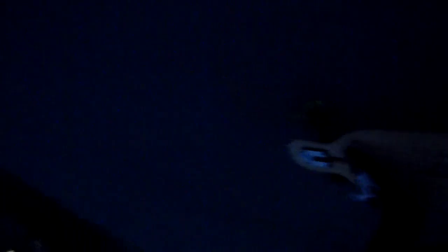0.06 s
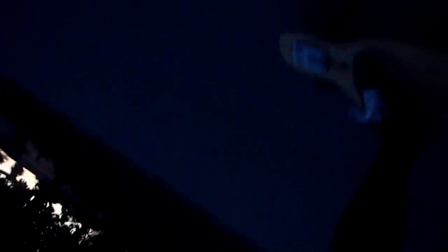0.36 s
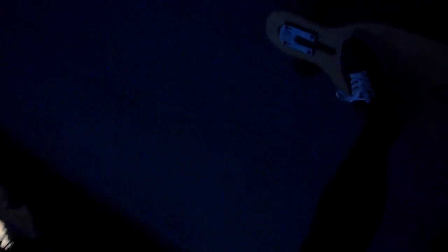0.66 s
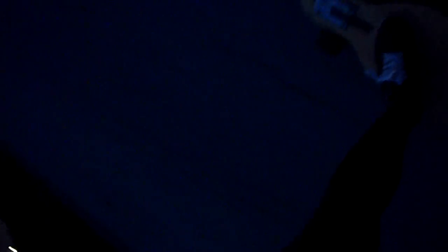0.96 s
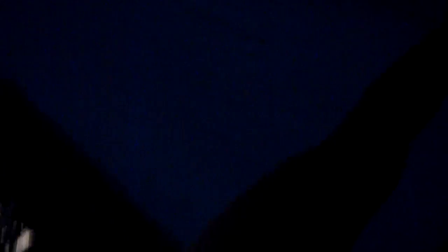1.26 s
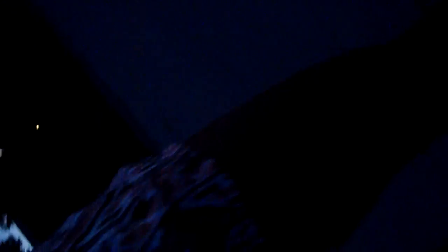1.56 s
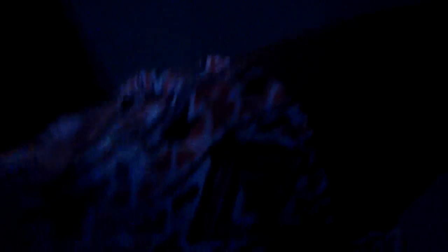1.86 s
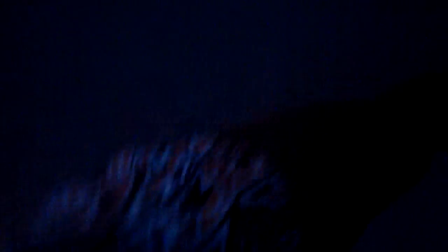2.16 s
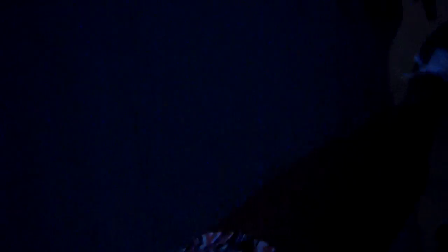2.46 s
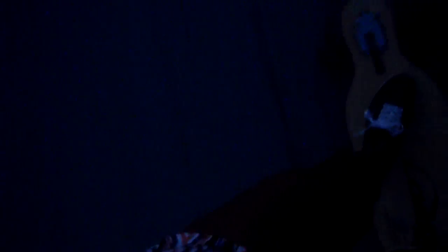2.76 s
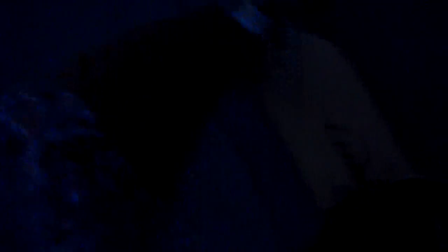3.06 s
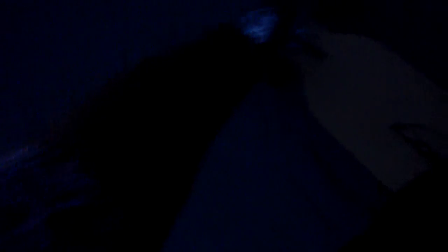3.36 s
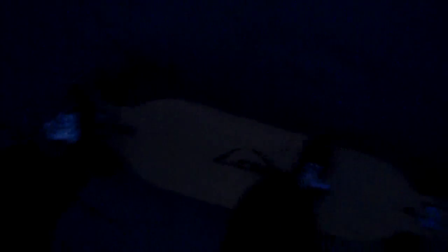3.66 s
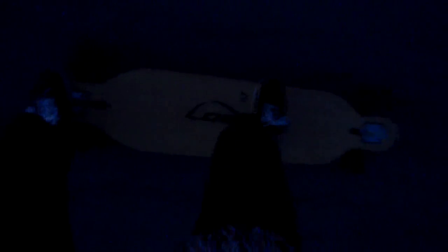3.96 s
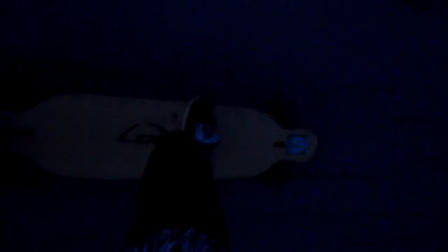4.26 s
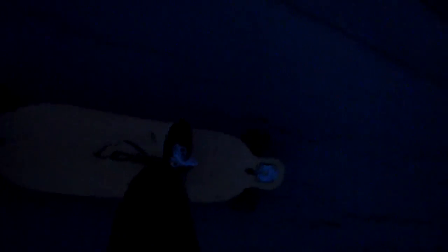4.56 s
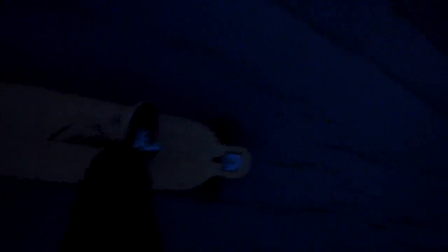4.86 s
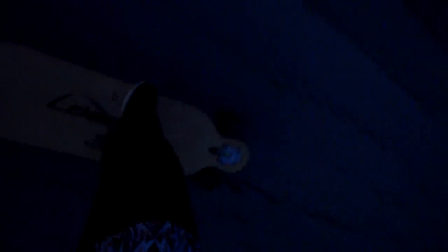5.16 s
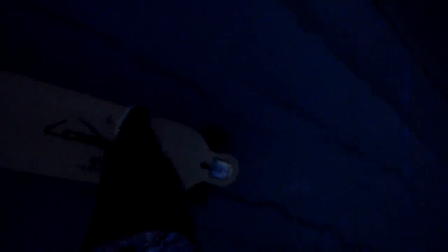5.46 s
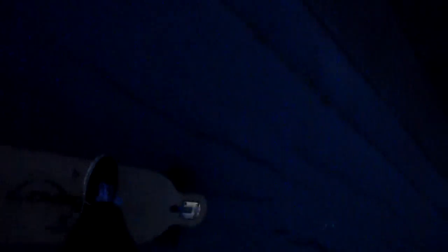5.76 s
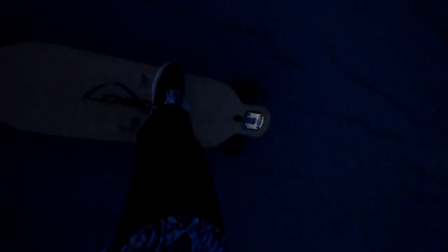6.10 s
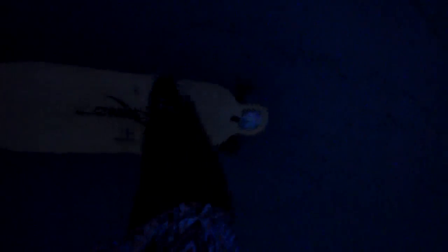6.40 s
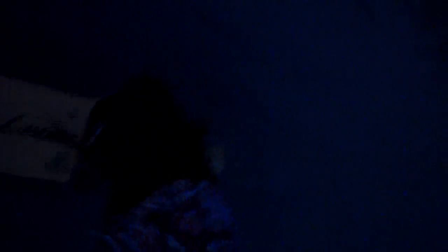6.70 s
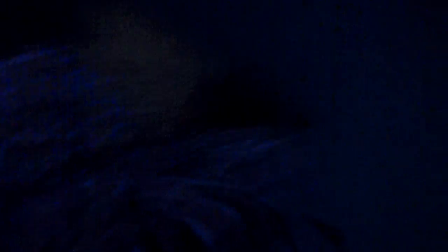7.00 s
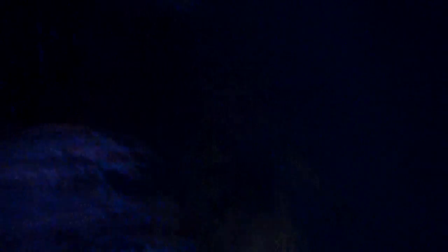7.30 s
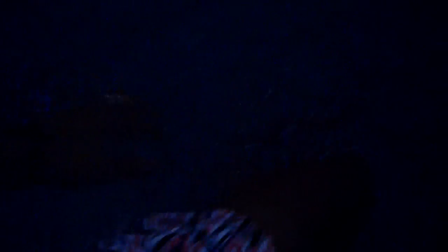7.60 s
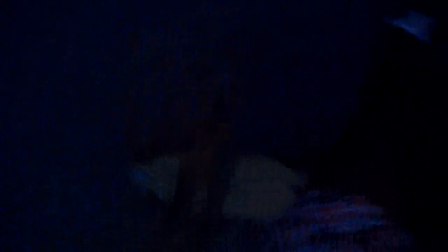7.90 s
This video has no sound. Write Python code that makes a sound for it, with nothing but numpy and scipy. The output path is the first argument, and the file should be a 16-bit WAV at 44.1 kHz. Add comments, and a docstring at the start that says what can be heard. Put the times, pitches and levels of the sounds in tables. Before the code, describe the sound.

Skateboard wheels rumble and crunch along pavement, with sharp clicks, handling knocks and wind puffs, until the rider steps off.

```python
"""Longboard on night asphalt

A longboard rolls over rough asphalt, heard by a small hand-held camera in a hard case. The road grain
drives the drone of wheels and deck and a gritty hiss that rings in the case near 5 kHz. Wheels scrub in
turns, stones snap, and a sole scuffs as the rider steps off. Air buffets the microphone; the case is
rubbed and knocked, and a limiter ducks the ride after hard knocks."""
import sys
import numpy as np
from scipy import signal
from scipy.fft import rfft, irfft, next_fast_len
from scipy.io import wavfile
from scipy.ndimage import minimum_filter1d

SR = 44100
rng = np.random.default_rng(int(sys.argv[2]) if len(sys.argv) > 2 else 0)


def wrap_up_sound(samples):
    """Save the sound to the file named by the first command line argument, as 16-bit audio."""
    columns = np.atleast_2d(samples).T
    # keep every value between -1 and 1, then stretch to whole-number steps
    tamed = np.clip(columns, -1, 1)
    steps = np.round(tamed * 32767).astype(np.int16)
    wavfile.write(sys.argv[1], SR, steps)


N = 358972
TIME = np.arange(N) / SR


def gain_of(db):
    """Decibels to gain."""
    return 10 ** (np.asarray(db) / 20)


def unit_rms(x):
    """Scales to rms 1."""
    return x / np.sqrt(np.mean(x ** 2) + 1e-20)


def add(mix, s, sound):
    """Lays a sound into the mix at time s."""
    part = mix[max(0, round(s * SR)):][:len(sound)]
    part += sound[:len(part)]


def curve(points):
    """An automation line through (time, value) points."""
    return np.interp(TIME, *np.transpose(points))


def faders(rows):
    """Each dB column of an automation table as a gain over time."""
    times, *columns = np.transpose(rows)
    return [gain_of(np.interp(TIME, times, db)) for db in columns]


def swell(s, half_s):
    """A smooth rise and fall about time s."""
    return np.exp(-np.minimum(((TIME - s) / half_s) ** 2, 50))


def wander(rate_hz, size=2 ** 14):
    """Random drift of rms 1, up to about rate_hz."""
    step_s = TIME[-1] / size
    hz = np.fft.rfftfreq(size, step_s)
    drift = irfft(rfft(rng.standard_normal(size)) * hz / (hz + 2) * np.exp(-(hz / rate_hz) ** 2))
    return unit_rms(np.interp(TIME, np.arange(size) * step_s, drift))


def grains(per_s, spread_db):
    """Random tiny impacts; a positive spread makes a few stand out, a negative one sinks some."""
    size = gain_of(spread_db * np.minimum(rng.exponential(1, N), 4))
    return unit_rms(size * rng.choice([-1., 1.], N) * (rng.random(N) < per_s / SR))


def equalised(x, points):
    """Shapes x with an EQ curve of (frequency [Hz], level [dB]) points, at rms 1."""
    point_hz, db = np.transpose(points)
    size = next_fast_len(N, real=True)
    hz = np.fft.rfftfreq(size, 1 / SR)
    response = gain_of(np.interp(np.log(hz + 1), np.log(point_hz), db))
    return unit_rms(irfft(rfft(x, size) * response, size)[:N])


def tilted(x, db_per_octave):
    """Brightens or dulls a short sound, at rms 1."""
    octaves = np.log2(np.fft.rfftfreq(len(x), 1 / SR) + 200)
    return unit_rms(irfft(rfft(x) * gain_of(db_per_octave * octaves), len(x)))


def resonate(x, hz, width_hz):
    """A steep resonance that follows the curve hz, at rms 1."""
    carrier = np.exp(2j * np.pi * np.cumsum(hz) / SR)
    pole = np.exp(-np.pi * width_hz / SR)
    return unit_rms((carrier * signal.lfilter([1], np.poly([pole, pole]), x / carrier)).real)


def ring(modes):
    """Dying modes of alternating sign; each place that is struck shifts and weights them differently."""
    t = TIME[:SR // 20]
    hz, db, t60 = np.transpose(modes)[:, :, None]
    shift, weight = rng.standard_normal((2, len(modes), 1))
    hz = hz * (1 + .03 * shift + .04 * rng.uniform(-1, 1))
    waves = gain_of(db + 1.5 * weight - 60 * t / t60) * np.sin(2 * np.pi * hz * t)
    return (-1) ** np.arange(len(modes)) @ waves


def bearing_whine(width_hz=19, waver=0.002):
    """A thin metallic whine and faint fizz, likely the bearings, exposed once the roll dies away."""
    # both: (frequency [Hz], level [dB])
    tones = [(4600, -12), (4770, -1), (4877, 4.5), (5015, 2), (5163, 0), (5346, -3.5)]
    fizz_eq = [(6000, -23), (7100, -5), (8200, -13), (9700, -1), (11500, -15)]
    rattle = rng.standard_normal(N)
    drift = 1 + waver * wander(24)
    whine = unit_rms(sum(gain_of(db) * resonate(rattle, hz * drift, width_hz) for hz, db in tones))
    fizz = gain_of(-9) * equalised(rattle, fizz_eq)
    return gain_of(curve([(6.0, -46), (7.4, -45.5)])) * (whine + fizz)


# Dark tone of air on the microphone: (frequency [Hz], level [dB])
WIND_EQ = [(30, -55), (130, -6), (280, 1.5), (420, -2.5), (650, -16), (3000, -68)]
# Low-end bed from the camera being carried: (time [s], level [dB])
CARRY_RUMBLE = [(3.2, -57.5), (3.7, -46), (6.6, -51.5), (7.4, -46)]
# Puffs on the moving microphone: (peak time [s], half length [s], rumble [dB], deep thud [dB])
AIR_PUFFS = [(0.9, 0.12, -39.5, -68), (3.767, 0.12, -26.5, -60), (4.116, 0.23, -33, -57),
             (4.151, .008, -35, -23), (4.43, 0.073, -35, -45), (5.657, 0.29, -36, -45),
             (6.356, 0.033, -37, -57), (7.06, 0.027, -30, -25), (7.28, 0.13, -30.5, -41.5),
             (7.533, 0.016, -35, -28), (8.005, 0.012, -17.5, -11)]


def wind(breeze_db=-47):
    """Lumpy low buffeting that swells in puffs, with deep thuds when the camera swings."""
    lumps = rng.standard_normal(N) * gain_of(3.16 * wander(28))
    rumble_gain, thud_gain = gain_of(breeze_db), gain_of(curve(CARRY_RUMBLE))
    for s, half_s, rumble_db, thud_db in AIR_PUFFS:
        puff = swell(s, half_s)
        rumble_gain = np.hypot(rumble_gain, gain_of(rumble_db) * puff)
        thud_gain = np.hypot(thud_gain, gain_of(thud_db) * puff)
    thuds = equalised(lumps, [(130, -20.5), (600, -63.0)])
    return rumble_gain * equalised(lumps, WIND_EQ) + thud_gain * thuds


# Resonances of the hard case: (frequency [Hz], level [dB], decay t60 [s])
CASE_MODES = [(400, -8.5, 0.013), (727, -2.5, 0.018), (1010, -2.5, 0.018), (1519, 3.5, 0.014),
              (2063, 5, 0.0053), (2423, 5.5, 0.0064), (2910, 0, 0.016), (3180, 4, 0.0044),
              (4730, -5, 0.022), (8700, -26, 0.087)]


def through_case(force):
    """A force on the case sets its short, hard modes ringing."""
    return signal.fftconvolve(force, ring(CASE_MODES))


# The grip slipping on the case: (time [s], length [s], level [dB], brightness [dB/octave])
GRIP_RUBS = [(0.184, 0.035, -29.5, -1), (4.058, 0.019, -26, 2.5), (4.081, 0.034, -27.5, 2),
             (4.394, 0.019, -29.5, -3.5), (4.542, 0.049, -30, -2), (4.782, 0.02, -30, -2),
             (5.767, 0.044, -23.5, -1.5), (6.997, 0.017, -8, 2), (7.006, 0.032, -19.5, -1),
             (7.23, 0.044, -31, -4), (7.505, 0.033, -33.5, 1), (7.608, 0.1, -35, -3.5),
             (7.716, 0.056, -31.5, -1.5), (7.824, 0.12, -37.5, 4.5)]


def grip_rubs(ring_trim_db=2.5, direct_trim_db=-13.5):
    """Uneven stick-slip pulses, heard directly and through the case modes."""
    out = np.zeros(N)
    slip_eq = [(700, -0.5), (1500, -3.5), (3000, -3.5), (4700, -15.0), (9000, -22)]
    slips = equalised(grains(520, spread_db=2), slip_eq)
    for s, length, db, brightness in GRIP_RUBS:
        stroke = slips[round(s * SR):][:round(length * SR)]
        stroke = tilted(stroke * signal.windows.tukey(len(stroke), .5), brightness)
        ringing = through_case(stroke)
        ringing *= np.sqrt(len(stroke) / np.sum(ringing ** 2))  # same energy as the stroke
        add(out, s, gain_of(db + ring_trim_db) * ringing)
        add(out, s, gain_of(db + direct_trim_db) * stroke)
    return out


def knock(db, contact_ms):
    """A half-sine push thumps the case and rings it; short contacts are bright, the shortest crack."""
    t = TIME[:SR // 20]
    push_s = max(contact_ms, .08) / 1100  # a little under the nominal contact time
    push = np.sin(np.pi * np.minimum(t / push_s, 1))
    body = through_case(push)[:len(t)]
    crack = signal.lfilter([1], [1, -.5], rng.standard_normal(len(t))) * np.exp(-t / 0.0007)
    crack_gain = gain_of(1 - (contact_ms / 0.054) ** 2)
    return gain_of(db) * (body / abs(body).max() + 0.27 * push + crack_gain * crack)


# Single hits on the case: (time [s], level [dB], nominal contact [ms])
CASE_HITS = [(1.9132, -9, 0.3), (2.146, -8.5, 0.31), (3.6085, -10, 0.31), (4.0942, 0.5, 0.3),
             (4.1335, -5, 0.38), (4.1518, 16.5, 0.16), (5.368, 9, 0.24), (5.7963, -5, 0.04),
             (6.1451, -7.5, 0.5), (6.6915, 1, 0.15), (6.9962, -2.5, 0.049), (7.04, -7.5, 0.59),
             (7.1243, -6.5, 0.25), (7.3474, -5, 0.038), (7.598, -12, 0.38), (7.7776, -6, 0.63),
             (7.8898, -16.5, 0.96), (8.1332, -5, 0.24)]
# Case chatter: (time [s], hits [count], gap [ms], first hit [dB], last hit [dB], nominal contact [ms])
CASE_CHATTER = [(0.266, 2, 12.5, -9.5, -6, 0.27), (4.7838, 2, 9.4, -4.5, -2, 0.29),
                (5.483, 2, 2.15, 15, 7.5, 0.2), (5.783, 2, 19, -13.5, -4.5, 0.62),
                (6.0208, 2, 2.07, 3, 5, 0.16), (6.743, 3, 15, -9, -7.5, 0.29),
                (6.822, 3, 11.7, -8.5, -7, 0.3), (6.993, 2, 20, -6, 0, 0.61),
                (7.4926, 3, 24, -17, -20, 0.93), (7.9843, 2, 4.8, 16, 16.5, 0.26),
                (8.01, 2, 13, 9, -1, 0.2)]


def case_knocks():
    """The case is knocked once, or chatters in short, evenly spaced runs."""
    out, hits = np.zeros(N), list(CASE_HITS)
    for s, count, gap_ms, first_db, last_db, contact_ms in CASE_CHATTER:
        for k, db in enumerate(np.linspace(first_db, last_db, round(count))):
            hits.append((s + k * gap_ms / 1000, db, contact_ms))
    for s, db, contact_ms in hits:
        add(out, s, knock(db, contact_ms))
    return out


# Tone of a sole on asphalt, mid body and a bright edge: (frequency [Hz], level [dB])
SOLE_EQ = [(150, -7), (780, 10), (1200, -0.5), (4000, -5), (4900, 6), (6000, -9), (15000, -39)]


def shoe_scuff(s=7.15, attack_s=0.0013, decay_s=0.06, level_db=-22):
    """A sole lands and scuffs along the road."""
    age = np.maximum(TIME - s, 0)
    envelope = (1 - np.exp(-age / attack_s)) * np.exp(-(age / decay_s) ** 2)
    return gain_of(level_db) * envelope * equalised(grains(5500, spread_db=-7.0), SOLE_EQ)


# Stones snapping under a wheel: (time [s], peak level [dB], pitch [Hz])
STONE_HITS = [(0.032, -8, 4640), (0.119, -6.5, 4840), (0.785, -12, 4560), (1.4573, -10, 4820),
              (1.5893, 0, 4600), (1.949, -8, 4770), (7.533, -18.5, 3870)]
# Ring of one snap: (frequency [multiple of pitch], level [dB], decay t60 [s])
STONE_MODES = [(.71, -5.5, 0.0068), (.86, -5, 0.012), (1, 3, 0.012), (1.17, 4.5, 0.0039)]


def stone_snaps():
    """Bright ticks of grit squeezed out from under a wheel, each at its own pitch."""
    out = np.zeros(N)
    for s, db, hz in STONE_HITS:
        tick = ring([(hz * ratio, mode_db, t60) for ratio, mode_db, t60 in STONE_MODES])
        add(out, s, gain_of(db) * tick / abs(tick).max())
    return out


def carve(width_hz=330, waver=0.027):
    """Wheels pressed sideways in a turn scrub and ring in narrow, wavering resonances."""
    # both: (frequency [Hz], level [dB])
    modes = [(1850, 4.5), (2380, 4.0), (2860, 2.5), (3720, 7.5)]
    scrub_eq = [(3000, -72), (4170, 4.5), (4650, 6.5), (6500, -55)]
    # (time [s], ringing [dB], scrub [dB])
    turns = [(0, -35.5, -30), (.6, -31, -30), (1.05, -45.5, -45),
             (1.8, -52, -69), (2.25, -37, -43), (2.75, -59, -76)]
    ring_gain, scrub_gain = faders(turns)
    slips = grains(6000, spread_db=1.0) * gain_of(5.2 * wander(86))
    ringing = sum(gain_of(db) * resonate(slips, hz * (1 + waver * wander(5.6)), width_hz)
                  for hz, db in modes)
    return ring_gain * unit_rms(ringing) + scrub_gain * equalised(slips, scrub_eq)


def loose_chips(per_s=16, fade_s=0.0046):
    """Chips crunch under the wheels at random: an envelope that jumps to 1 and fades at once."""
    hits = (rng.random(N) < per_s / SR).astype(float)
    return np.minimum(signal.lfilter([1], [1, -np.exp(-1 / (fade_s * SR))], hits), 1)


# Top-end hiss, peaking where the case rings: (frequency [Hz], level [dB])
HISS_EQ = [(2000, -24.5), (3500, -17), (4350, -5.5), (4720, 1), (5250, 0), (5600, -5.5), (6100, -14),
           (7100, -10), (8100, -19), (10000, -24), (14000, -29.5), (14500, -56)]


def road_hiss(contact, crunch_db):
    """The road grain hisses through the case, and single grains ping in it."""
    hiss = equalised(contact * gain_of(crunch_db + 2 * wander(130)), HISS_EQ)
    ticks = grains(200, spread_db=2.5) * gain_of(crunch_db)
    pings = resonate(ticks, np.full(N, 4780), width_hz=250)
    return unit_rms(hiss + 0.52 * pings)


# Midrange bite of the road grain: (frequency [Hz], level [dB])
GRIT_EQ = [(100, -14), (1000, 9.5), (1250, 6.5), (1550, 8), (1950, 2.5), (2250, 9.5), (2520, 5.5),
           (2820, 7.5), (3150, 1), (4500, -4.5), (7000, -61)]
# Asphalt turning grittier and smoother by stretches: (time [s], base grit level [dB])
GRIT_LEVEL = [(0.6, -54), (2.1, -40), (2.85, -46.5), (3.3, -46.5), (4.4, -39), (5.2, -46), (6.2, -39.5)]


def road_grit(contact, roughness_db):
    """The kicks of the road grain make a flickering crunch that follows the surface."""
    kicks = contact * gain_of(roughness_db + wander(51))
    return gain_of(curve(GRIT_LEVEL)) * equalised(kicks, GRIT_EQ)


# Low-mid body of wheels and deck: (frequency [Hz], level [dB])
DRONE_EQ = [(50, -48), (150, -12), (300, -17.5), (420, -2.5), (520, -2), (750, -1.5), (900, -10.5),
            (3000, -51)]
# Wheel hum rising with speed and sinking again: (time [s], pitch [Hz])
HUM_PITCH = [(1.2, 540), (1.6, 626), (2.25, 630), (2.82, 608), (3.02, 513), (4.3, 508)]


def wheel_drone(roughness_db):
    """The road shakes wheels and deck into a broad drone with a fluttering, pitched hum."""
    drone = equalised(rng.standard_normal(N) * gain_of(roughness_db), DRONE_EQ)
    flutter = gain_of(2.6 * wander(24))
    hum_hz = curve(HUM_PITCH) * (1 + 0.017 * wander(6.1))
    hum = unit_rms(flutter * resonate(rng.standard_normal(N), hum_hz, width_hz=78))
    return unit_rms(drone + 0.67 * hum)


# Drive of the roll as speed and asphalt change; the rider steps off near 7.2 s: (time [s], level [dB])
ROLL_LEVEL = [(0.0, -31.5), (0.5, -29), (1.23, -36.5), (1.56, -29.5), (2.25, -27), (2.62, -36.5),
              (2.95, -27.5), (3.25, -34), (3.7, -26), (5.1, -25.5), (6.3, -27.5), (6.52, -32.5),
              (6.68, -25), (7.2, -40.5), (7.45, -49)]
# Treble fader on grit and hiss together: (time [s], gain [dB])
TREBLE_TRIM = [(0.0, 7), (0.6, 6.5), (1.65, 0), (2.2, 0.5), (3.85, -3), (4.35, -0.5), (5.3, 3), (5.9, -0.5),
               (6.9, -3), (7.4, -6)]
# Coarse spots that roughen the roll for an instant: (time [s])
COARSE_SPOTS = [1.354, 2.261, 4.951, 5.065, 5.255]
# Sand, where hiss surges and wheels rasp: (peak time [s], half length [s], hiss boost [dB], rasp [dB])
SANDY_STRETCHES = [(2.835, 0.16, 1.5, -47), (3.67, 0.036, 8, -44), (5.32, 0.046, 1.5, -45),
                   (5.9, 0.056, 5, -40), (6.31, .08, 4.5, -49)]


def wheels(usual_roll_db=-29.5, drone_trim_db=-4.5, hiss_db=-35, grit_growth=0.32, hiss_growth=0.24):
    """Road grain excites drone, grit and hiss, which grow with the roll; sand adds hiss and a rasp."""
    roll_db, treble_db = curve(ROLL_LEVEL), curve(TREBLE_TRIM)
    drive_db = roll_db - usual_roll_db
    surge_db = sum(db * swell(s, half_s) for s, half_s, db, _ in SANDY_STRETCHES)
    rasp_gain = sum(gain_of(db) * swell(s, half_s) for s, half_s, _, db in SANDY_STRETCHES)
    patches_db = 1.4 * wander(40) + 6.7 * sum(swell(s, 0.011) for s in COARSE_SPOTS)
    crunch_db = patches_db + 9 * loose_chips()
    bumps_db = wander(150)
    # each stone of the asphalt gives the wheel a tiny kick
    contact = unit_rms(grains(3000, spread_db=2.5) + 0.72 * rng.standard_normal(N))
    drone = wheel_drone(patches_db + bumps_db)
    grit = road_grit(contact, crunch_db + 2 * bumps_db)
    rasp = resonate(contact * gain_of(2 * bumps_db), 2650 * (1 + 0.049 * wander(5.6)), width_hz=630)
    hiss = road_hiss(contact, crunch_db)
    return (gain_of(roll_db + drone_trim_db) * drone
            + gain_of(grit_growth * drive_db + treble_db) * grit
            + rasp_gain * rasp
            + gain_of(hiss_db + hiss_growth * drive_db + treble_db + surge_db) * hiss)


def scene():
    """The ride, the air and the handling noise meet at one microphone."""
    ride = wheels() + carve() + bearing_whine()
    return (ride + wind() + shoe_scuff() + case_knocks() + grip_rubs() + stone_snaps())[None]


def record(dry, ceiling=0.72, hold_s=0.055, recovery_db_per_s=170, attack_s=0.00071, cutoff_hz=15000):
    """A limiter clamps fast, holds and recovers slowly; what slips past saturates; then a low-pass."""
    over_db = np.maximum(20 * np.log10(abs(dry[0]) / ceiling + 1e-9), 0)
    half_hold = round(hold_s * SR / 2)
    held_db = -minimum_filter1d(-over_db, 2 * half_hold + 1, origin=half_hold)
    recovery_db = TIME * recovery_db_per_s
    duck_db = np.maximum.accumulate(held_db + recovery_db) - recovery_db
    attack_pole = np.exp(-1 / (attack_s * SR))
    limited = dry / gain_of(signal.lfilter([1 - attack_pole], [1, -attack_pole], duck_db))
    saturated = limited / (1 + (limited / .66) ** 6) ** (1 / 6)
    low_pass = signal.firwin(127, cutoff_hz, window=("kaiser", 9), fs=SR)
    return signal.oaconvolve(saturated, low_pass[None], "same")


dry = scene()
out = record(dry)
wrap_up_sound(out)
```